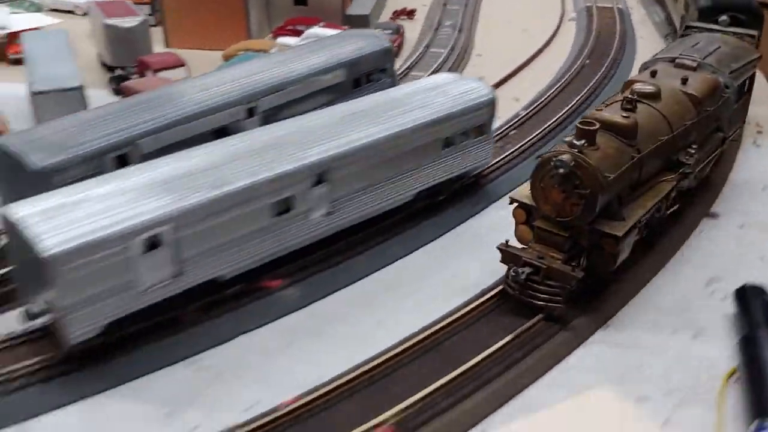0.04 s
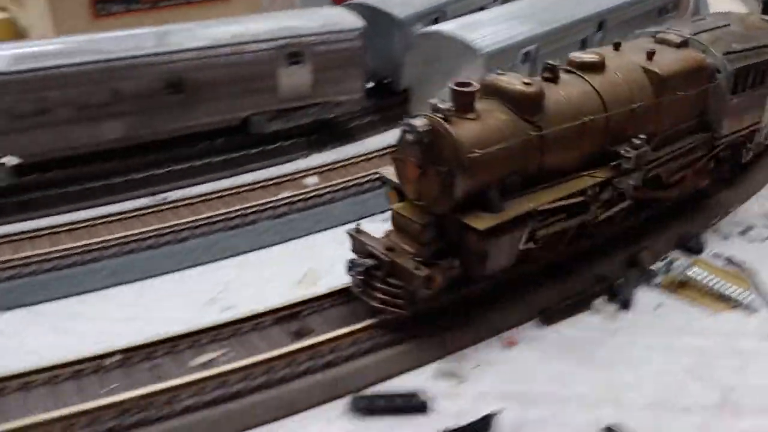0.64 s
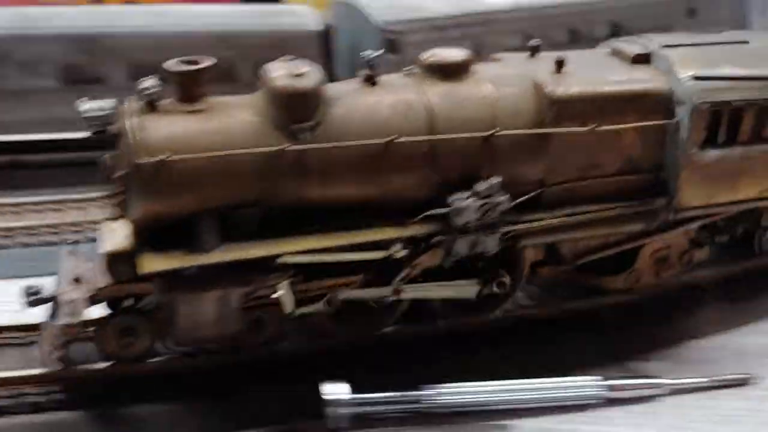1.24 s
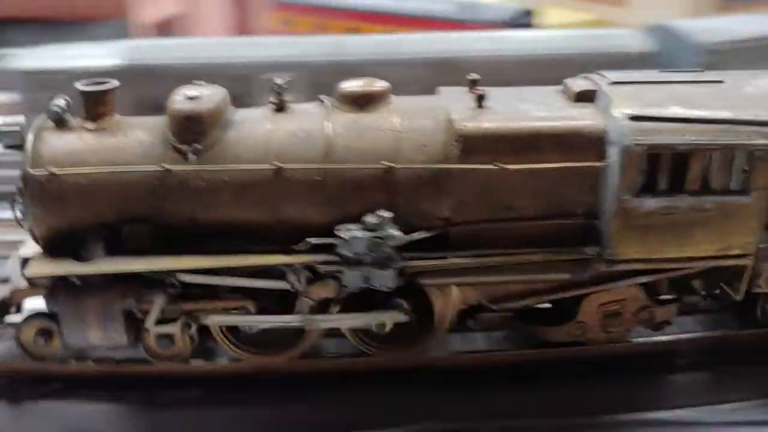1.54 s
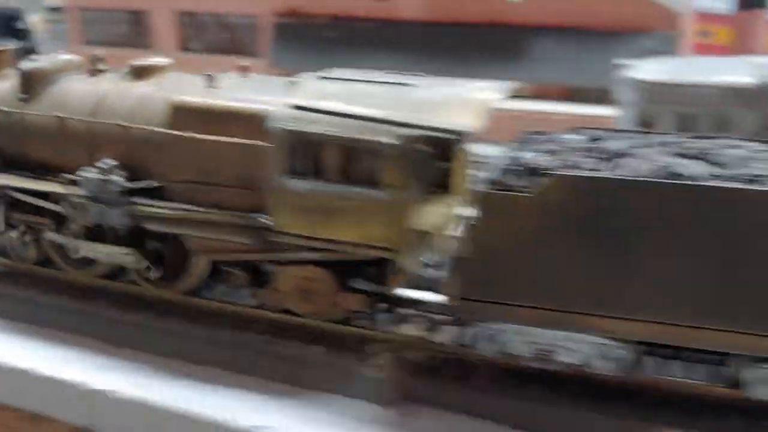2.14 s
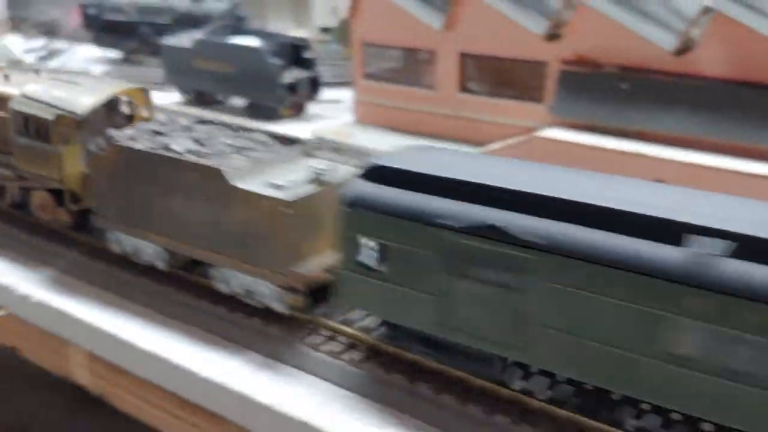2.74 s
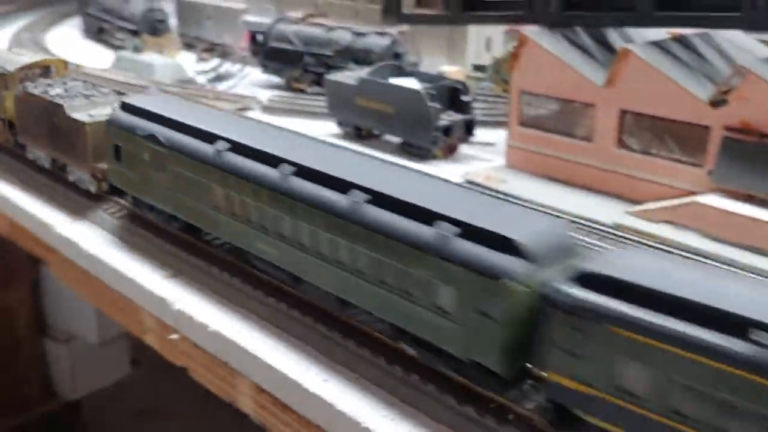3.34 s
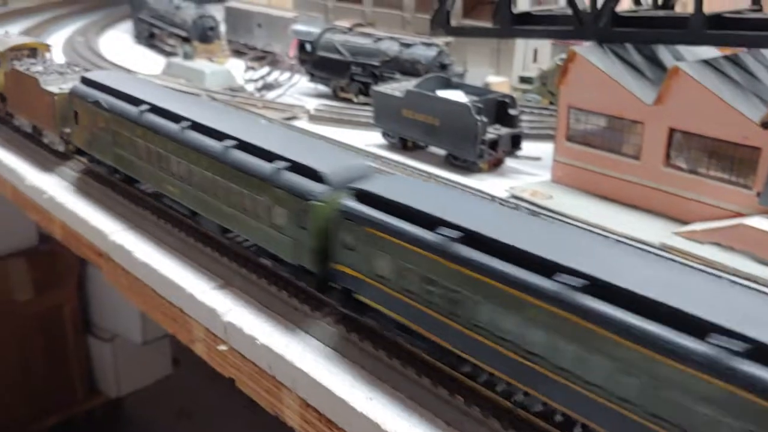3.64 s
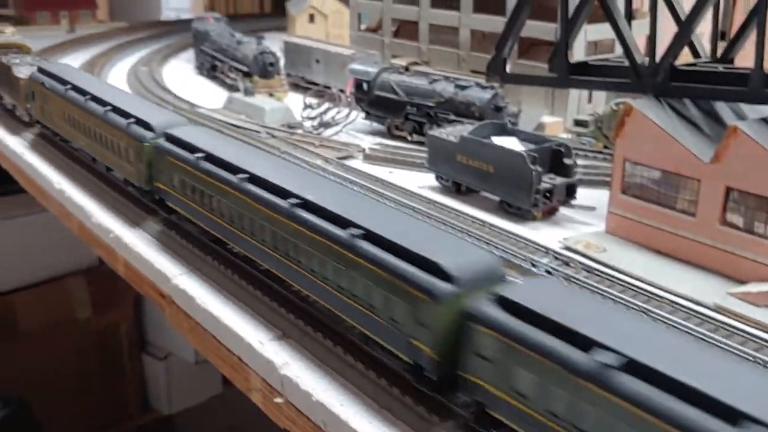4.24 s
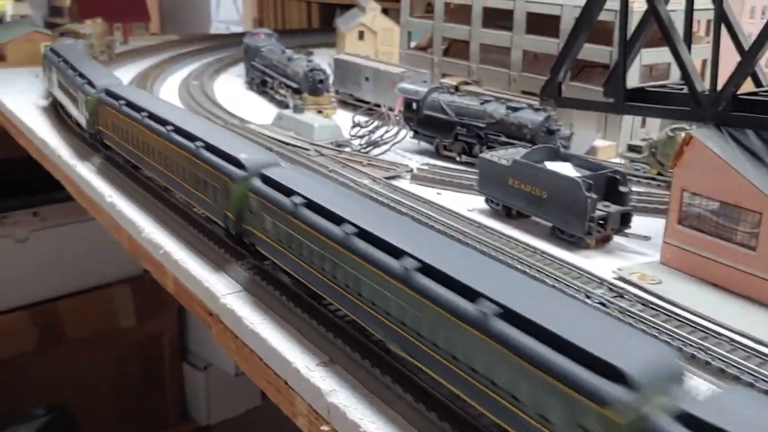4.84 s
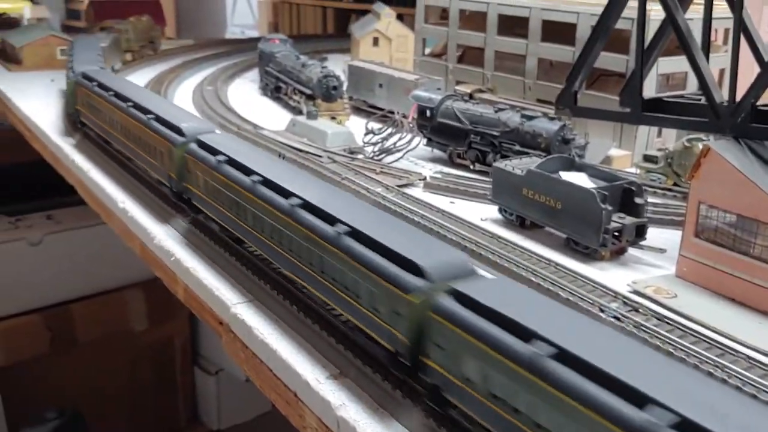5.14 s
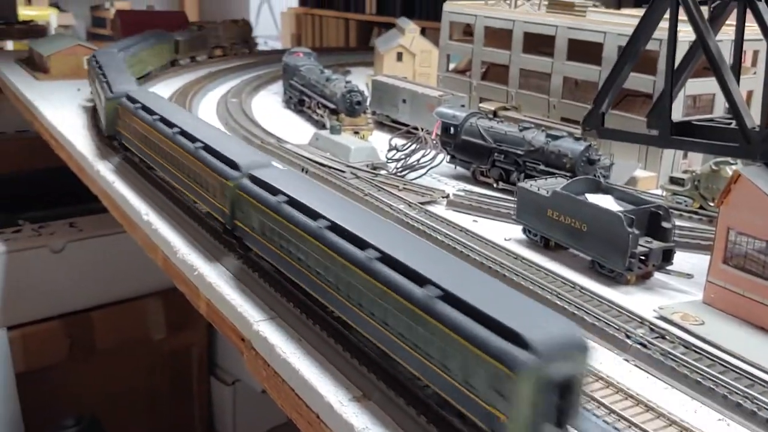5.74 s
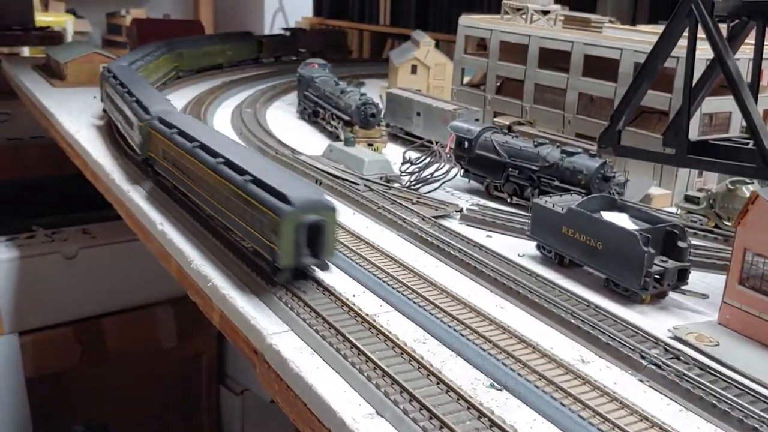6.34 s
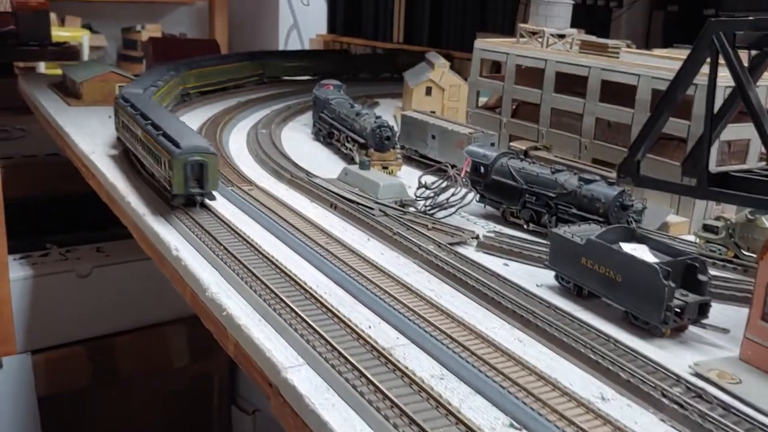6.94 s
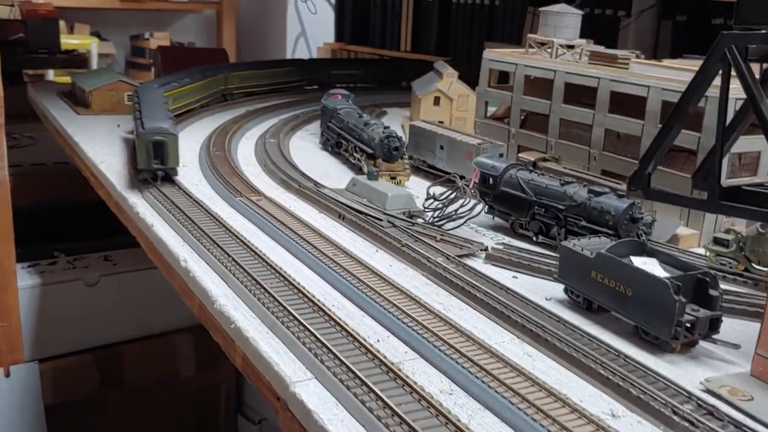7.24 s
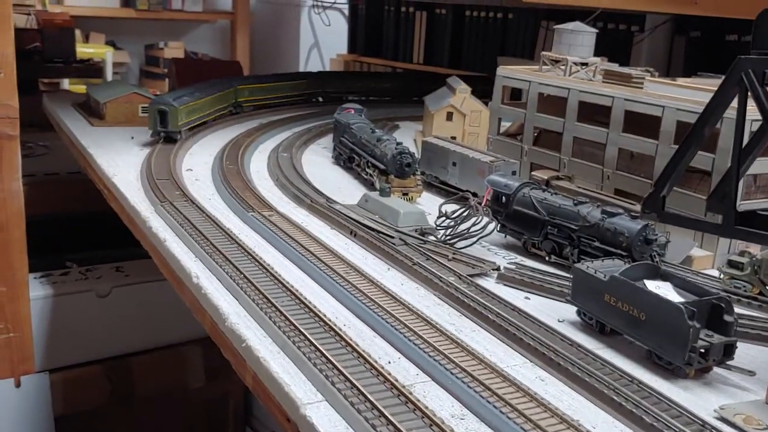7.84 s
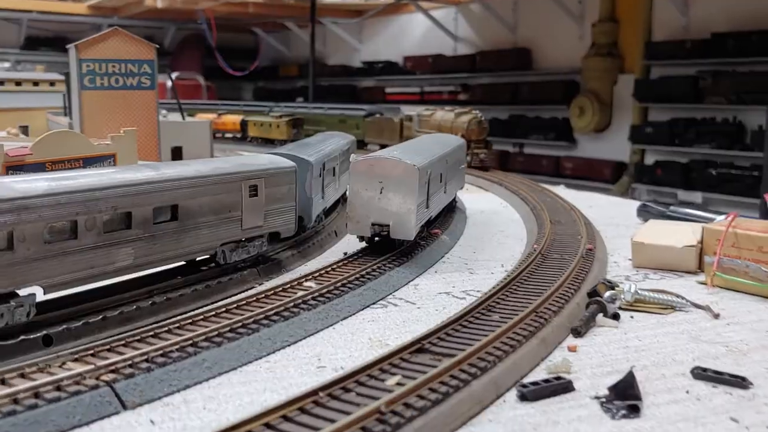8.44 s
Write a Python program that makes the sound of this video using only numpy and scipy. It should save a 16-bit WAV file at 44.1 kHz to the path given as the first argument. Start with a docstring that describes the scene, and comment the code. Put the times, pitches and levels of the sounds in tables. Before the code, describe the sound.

A model steam locomotive runs close by on an indoor table layout, over a steady low hum from the board. From the start its gears growl and whine with a wavering note, while the wheels tick over rail joints. It is nearest at about 1 to 2 seconds, when loose side rods clack and chatter. The hollow tender passes around 3 seconds with a cluster of clicks and a thin, high scraping hiss. The coaches follow until about 6 seconds, their wheels ringing in a quick uneven beat with swells of hollow roar. One coach lurches with a knock at 5.2 seconds. From about 5.7 seconds the gears fade somewhat and the wheels grind through a curve. At about 8 seconds a thin tick marks a sudden change to the locomotive approaching again, with a motor drone, rasping gears and a brief rattle at 8.5 seconds.

```python
"""A model steam locomotive passes close by on a table layout: its gears growl and whine, the baseboard
hums, and slack side rods clack. The hollow tender and the coaches follow, their wheels ringing in an
uneven beat and ticking over rail joints. A coach lurches, the locomotive turns out of sight, and the
flanges grind in the curve. Near the end the scene jumps, with a thin tick, to a spot where the
locomotive is heard approaching again."""
import sys
import numpy as np
from scipy import signal
from scipy.fft import rfft, irfft, next_fast_len
from scipy.io import wavfile
from scipy.ndimage import uniform_filter1d, map_coordinates

SR = 44100
rng = np.random.default_rng(int(sys.argv[2]) if len(sys.argv) > 2 else 0)


def unload_audio(sound):
    """Save the sound as a 16-bit wav file, at the path given as the first command line argument."""
    columns = np.transpose(np.atleast_2d(sound))
    # keep every value between -1 and 1, then stretch to whole-number steps
    steps = np.round(np.clip(columns, -1, 1) * 32767)
    wavfile.write(sys.argv[1], SR, steps.astype(np.int16))


N = 379240
TIME = np.arange(N) / SR

# Spectra of the radiating parts: (frequency [Hz], relative level [dB])
GEAR_SPECTRUM = [(150, -62), (330, -10), (430, -6.5), (530, -1), (680, -1), (850, -0.5), (1100, 0),
                 (1400, -1), (2000, -2), (3500, -32), (7000, -51)]
FAR_GEAR_SPECTRUM = [(250, -10), (450, 0.5), (950, 4.5), (1200, 3.5), (1750, 7), (2500, 0.5), (3200, -1),
                     (4000, 4), (4500, -1.5), (5400, -6), (7000, -9), (16000, -15)]
RATTLE_SPECTRUM = [(1000, -28), (2200, -1), (3000, 6), (3800, 2), (4700, 3), (5600, -1), (7000, 0.5),
                   (16000, -4.5)]
FAR_RATTLE_SPECTRUM = [(1000, -18), (2000, 3), (3000, 3), (4000, 9), (5400, -3), (7000, 1.5), (10000, -5),
                       (16000, -11)]
TREAD_SPECTRUM = [(300, -22), (700, -15.5), (1100, -7), (1450, -3.5), (1700, -1.5), (1950, -2), (2300, -3),
                  (2600, -5), (3200, -8), (4200, -10.5), (5500, -17.5), (9000, -31)]
SCRAPE_SPECTRUM = [(4000, -40), (8000, -8), (10500, 4.5), (13000, 0), (15500, -3)]
GRIND_SPECTRUM = [(1600, -23), (2300, -3), (2600, 5), (3100, 0), (4500, -14), (8000, -29)]
TRUCK_SPECTRUM = [(300, -14), (2000, 2), (7000, 2.5), (8500, -1), (10500, -30)]
RAIL_END_SPECTRUM = [(6000, -40), (8500, -4), (10000, 3), (15000, 4)]
ROAR_SPECTRUM = [(450, -37), (750, -1.5), (1000, -5.5), (1300, 0.5), (1600, -4), (2300, -33)]
DRONE_SPECTRUM = [(90, -27), (125, -3), (148, 5.5), (170, -2.5), (210, -13.5), (300, -63)]
BOARD_SPECTRUM = [(35, -34), (70, -19), (105, -2), (130, 3.5), (160, -5), (185, 0), (210, -1.5), (270, -6),
                  (340, -7), (430, -12.5), (900, -55)]
FRAME_SPECTRUM = [(15, -18), (28, -11), (38, -14), (49, 2.5), (56, -1), (66, -2.5), (85, -5.5), (120, -27),
                  (250, -56)]
TICK_SPECTRUM = [(2000, -22), (6000, -12), (9000, -6), (16000, -4)]
# Resonances of metal parts: (frequency [Hz], bandwidth [Hz], relative level [dB])
BOILER_MODES = [(498, 20, 7), (603, 31, 3.5), (700, 43, -1), (784, 90, -9)]
WHEEL_MODES = [(1724, 120, -16), (1980, 210, -3), (2255, 140, -5.5)]
TENDER_MODES = [(190, 38, -1.5), (255, 60, -9.5), (693, 88, 0.5), (1133, 110, 0.5), (1304, 99, 0)]
# Resonances of a coach body: (frequency [Hz], level [dB], 60 dB decay time [s])
COACH_MODES = [(417, -14.5, .05), (360, -33, .04), (490, -30, .035)]
# Tonal swells of gears and baseboard: (time [s], frequency [Hz], level [dB], half-width [s])
GEAR_WHINES = [(.14, 646, -35, 0.08), (0.58, 637, -37, 0.15), (1.0, 658, -39, 0.088),
               (1.497, 654, -39.5, 0.07), (1.966, 571, -39.5, .14), (2.7, 673, -42, 0.15),
               (4.87, 644, -42, 0.09)]
BOARD_BUMPS = [(0.344, 205, -32.5, 0.042), (1.234, 85.7, -28.5, 0.021), (1.387, 114.5, -34, 0.027),
               (2.128, 75.5, -35, 0.033), (6.805, 126, -39, 0.044)]
# Tones of rubbed metal: (time [s], frequency [Hz], bandwidth [Hz], level [dB], half-width [s])
LOCOMOTIVE_TONES = [(.17, 1910, 40, -39, 0.14), (.2, 334.7, 50, -42, 0.18), (.12, 910, 35, -39, 0.12),
                    (.15, 1510, 90, -41, 0.22), (.37, 2000, 45.5, -40, 0.057), (.5, 634, 30, -36.5, 0.055),
                    (.65, 595, 45, -36, 0.088), (.89, 1082, 80, -38, 0.09), (1.08, 1097, 45, -35.5, .09),
                    (1.14, 2040, 40, -34, 0.06), (.68, 2100, 200, -38, .17), (1.1, 1623, 109, -36, .14),
                    (1.13, 2910, 352, -35, 0.19), (1.4, 1400, 149.3, -38, 0.11),
                    (1.472, 510, 60.7, -41, 0.28), (1.6, 1653, 110, -38, .16)]
WHEEL_TONES = [(2.05, 1730, 121, -41, 0.098), (2.33, 1815, 110, -37.5, 0.09), (2.64, 1690, 100, -35.5, .12),
               (2.97, 1973, 50, -36, .1), (3.2, 1935, 40.2, -34, 0.052), (3.52, 1950, 40, -31, .055),
               (3.76, 2360, 110, -37.5, .07), (3.84, 1980, 130, -34, 0.08), (3.95, 1760, 130.6, -41, 0.33),
               (4.19, 2016, 70, -33.5, 0.06), (4.5, 1895, 80, -37, .07), (5.12, 2050, 90, -37, .06),
               (5.21, 1820, 50, -38.5, .035), (5.9, 2105, 159.6, -48, .35), (6.8, 2100, 119, -40, 0.065),
               (7.34, 1950, 79.7, -38, 0.11), (7.58, 1930, 60, -38, 0.1), (7.87, 1900, 80.6, -37, .08)]
# Moments of harder rattling and rubbing: (time [s], gain [dB], half-width [s])
RATTLE_BOOSTS = [(.11, 3, 0.072), (1.83, 0.8, 0.087), (4.3, 1.1, 0.25), (6.76, 0, 0.053), (7.9, 2, 0.18)]
CURVE_RUBS = [(5.27, 0.7, .2), (7.25, 2, 0.089), (7.83, 1.5, 0.22)]
# Side rods striking their bearings: (time [s], level [dB])
ROD_CLACKS = [(1.096, -22), (1.118, -23), (1.229, -15), (1.3105, -20), (1.4326, -22), (1.5673, -22),
              (1.7345, -26), (1.7963, -19), (1.8462, -20), (1.9315, -26), (2.0313, -23)]
# Flanges biting the rail: (time [s], level [dB], rise [s], fall [s])
FLANGE_BITES = [(.55, -35, 0.96, .65), (2.95, -32.5, 0.2, 0.58), (3.85, -33.5, 0.38, 1.1)]
# Rail-gap hits, also holding the side-rod clacks at 1.2296 and 1.3109 s: (time [s], relative level [dB], truck
# gain [dB])
RAIL_JOINTS = [(0.092, -36, 0), (0.2433, -39, -2), (0.339, -33, -14), (0.4125, -36, -9), (0.4342, -35, -8),
               (0.5761, -38, -4), (0.8545, -39, -8), (1.137, -34, 1), (1.2296, -35, -3), (1.3109, -38, -3),
               (1.65, -35, -12), (2.209, -36.5, 3), (2.299, -38, 1), (2.7382, -35, -2), (2.8916, -34, 1),
               (2.9208, -35, -7), (2.938, -35, -4), (3.065, -41, 6.5), (3.1108, -37, 3), (3.1817, -36, -2),
               (3.7189, -31, -5), (6.8044, -45, 5), (8.2217, -44, 5), (8.4008, -38, -14)]
# Swells of the hollow coaches: (time [s], level [dB], half-width [s])
COACH_ROARS = [(2.717, -36.5, 0.13), (3.13, -32.5, 0.11), (3.8, -37.5, .22), (4.35, -37.5, 0.29),
               (4.902, -42, 0.13), (5.3, -32.7, 0.16), (6.7, -40, 0.27)]
# Likeness of the two channels: (frequency [Hz], correlation [-1 to 1])
COHERENCE = [(60, 0.91), (130, 0.98), (290, 0.89), (640, 0.71), (1000, 0.24), (1400, -0.041), (3000, -0.01)]
# Direction of the passing train: (time [s], left minus right [dB])
TRAIN_PAN = [(0, 3.5), (2, 1), (7.8, -.5), (8.6, 1)]
# Direction of the approaching gears: (frequency [Hz], left minus right [dB])
FAR_GEAR_PAN = [(700, 7.0), (1300, -0.5), (2400, -0.5), (4200, -11.0), (7000, -2.0)]
# Response of the two channels: (frequency [Hz], left gain [dB], right gain [dB])
CHANNEL_GAINS = [(100, -0.3, -1), (785, 3, 3), (1270, 2, 1), (1874, -5, 6), (2680, 1, 4), (4040, -0.1, 2.5),
                 (5370, 0.5, 1.3), (6400, -1.5, 3.5), (6994, -7, 11), (7964, -17, -9.5),
                 (8510, -33.5, -33.5), (9990, -9, -18), (10200, -26.5, -14), (11470, -9.5, -11),
                 (13400, -31, -18.5), (15200, -38.7, -30)]

# Parts going by: (nearest time [s], half-power time [s], direct level [dB], reverberant level [dB])
GEAR_PASS, WHEEL_PASS = (1.25, 1, -29, -33.5), (2.5, 2.2, -27, -28.5)
ROD_PASS, COUPLER_PASS = (1.75, 0.75, -25, -36.5), (3.5, 0.74, -32.5, -41)
BOARD_PASS, COACH_PASS = (0.6, 0.52, -32.5, -41.5), (4.5, 0.6, -42.5, -46.5)
COACHES_S, CURVE_S, JUMP_S = 2.62, 5.74, 8.056


def gear_growl(beat):
    """Impact noise: gear teeth collide, then fall into the cars' acoustic shadow in the curve."""
    shadow_db = 4 * onset(CURVE_S, 0.3)
    teeth = interference(noise() + 0.68 * impacts(600, 7.3), depth_db=2.0)
    return pass_by(*GEAR_PASS) * amp(-0.48 - shadow_db + 0.23 * beat) * radiate(teeth, GEAR_SPECTRUM)


def gear_whine():
    """Periodic excitation: the gear mesh sings a wavering note with a weak third harmonic."""
    wavering_time = np.cumsum(1 + 0.017 * wobble(70)) / SR
    out = np.zeros((2, N))
    for s, hz, db, width_s in GEAR_WHINES:
        phase = 2 * np.pi * hz * wavering_time + np.array([[0], [.7]])
        out += amp(db) * swell(s, width_s) * (np.sin(phase) + amp(-17) * np.sin(3 * phase))
    return amp(2.0 * wobble(25.3)) * out


def rolling_wheels(beat):
    """Rolling contact: rough treads rumble, and the coach wheels ring at their natural modes."""
    treads = radiate(interference(noise() + .5 * impacts(1800, 5.3), depth_db=2.06), TREAD_SPECTRUM)
    arrived = onset(COACHES_S, 0.39)
    ring = arrived * amp(-9.5 + 1.2 * wobble(9)) * resonate(noise() + impacts(1800, 8.1), WHEEL_MODES)
    gain_db = boost_db(CURVE_RUBS) - 1.7 + 0.31 * beat + 0.6 * wobble(32) + 0.35 * wobble(6)
    return pass_by(*WHEEL_PASS) * amp(gain_db) * (amp(-2.7 * (1 - arrived)) * treads + ring)


def wheel_beat(turn_hz=10.8, drift_hz=0.594):
    """Amplitude modulation: out-of-round wheels bear down once a turn, some turns harder than others."""
    angle = 2 * np.pi * np.cumsum(turn_hz + drift_hz * wobble(2.466)) / SR
    return (np.cos(angle) - 0.26 * np.sin(2 * angle)) * (1 + 0.14 * wobble(3.8))


def loose_rattle(beat):
    """Mechanical play: loose rods and couplers chatter as they go by, and their powers add."""
    chatter = interference(noise() + 0.7 * impacts(1300, 9.5), depth_db=2.0)
    nearness = np.hypot(pass_by(*ROD_PASS), pass_by(*COUPLER_PASS))
    gain_db = boost_db(RATTLE_BOOSTS) - 0.12 + 0.81 * beat + 1.33 * wobble(60)
    return nearness * amp(gain_db) * radiate(chatter, RATTLE_SPECTRUM)


def side_rods(t60_s=0.036):
    """Damped impact: each knock of a rod in its slack bearing decays exponentially."""
    envelope = sum(amp(db - 60 * abs(TIME - s) / t60_s) * (TIME >= s) for s, db in ROD_CLACKS)
    return envelope * radiate(noise(), RATTLE_SPECTRUM)


def flange_scrape(beat):
    """Sliding friction: flanges bite the rail with a high hiss and let go."""
    bite = sum(amp(db) * swell(s, rise, fall) for s, db, rise, fall in FLANGE_BITES)
    flutter = amp(1.2 * beat + 2.1 * wobble(40))
    return bite * flutter * radiate(noise() + impacts(350, 6.4), SCRAPE_SPECTRUM)


def rubbed_metal(tones):
    """Friction-driven resonance: modes sing out in turn, each a wavering note over a noisy ring."""
    out = np.zeros((2, N))
    for s, hz, band_hz, db, width_s in tones:
        phase = 2 * np.pi * np.cumsum(hz + 0.4 * band_hz * wobble(70)) / SR
        note = np.sqrt(2) * np.sin(phase + rng.uniform(-0.95, 0.84, (2, 1)))
        ring = amp(-2.5) * resonate(noise(), [(hz, band_hz, 0)])
        out += amp(db) * swell(s, width_s) * unit(note + ring)
    return out


def tender(nearest_s=2.9):
    """Shell resonance: the hollow tender rings, loudest when nearest."""
    distance = np.hypot(1, (TIME - nearest_s) / 0.69)
    return amp(-31.3) / distance ** 2 * resonate(noise(), TENDER_MODES)


def coach_roar():
    """Cavity resonance: the hollow coaches roar over some stretches of track."""
    envelope = sum(amp(db) * swell(s, width_s) for s, db, width_s in COACH_ROARS)
    return envelope * radiate(noise(), ROAR_SPECTRUM)


def curve_grind(beat):
    """Sliding friction: the coaches' flanges grind once the train is in the curve."""
    level_db = -40.5 + boost_db(CURVE_RUBS) + 0.87 * beat + 1.9 * wobble(45) + 1.6 * wobble(9)
    friction = noise() + 1.3 * impacts(260, 5.3)
    return onset(CURVE_S, 0.37) * amp(level_db) * radiate(friction, GRIND_SPECTRUM)


def coach_lurch(s=5.226, lead_s=.012):
    """Free vibration: a coupler clacks, then the jolted coach body rings in damped modes."""
    body = sum(amp(db) * blow(s, .005, t60_s) * np.sin(2 * np.pi * hz * (TIME - s))
               for hz, db, t60_s in COACH_MODES)
    clacks = blow(s - lead_s, .001, .025) + blow(s, .002, 0.059)
    return body + amp(-27) * clacks * radiate(noise(), TREAD_SPECTRUM)


def rail_joints(flight_s=0.0045, loss_db=9):
    """Inelastic collision: a wheel strikes a rail gap, or a rod its bearing, and bounces twice, weaker each
    time."""
    rail, truck = np.zeros((2, 2, N + SR))
    t = np.arange(SR // 20) / SR
    decay = amp(-60 * t / 0.0059) + 0.14 * amp(-60 * t / 0.027)  # sharp tick, then metallic shiver
    for s, db, truck_db in RAIL_JOINTS:
        for bounce in range(3):
            at = round((s + bounce * flight_s * rng.uniform(.6, 1.4)) * SR)
            hit = amp(db + 20 - bounce * loss_db) * decay * rng.standard_normal((2, len(t)))
            rail[:, at:at + len(t)] += hit
            truck[:, at:at + len(t)] += amp(truck_db) * hit
    return coloured(rail[:, :N], RAIL_END_SPECTRUM) + coloured(truck[:, :N], TRUCK_SPECTRUM)


def approaching_motor(beat, note_hz=600):
    """Forced vibration: the motor drones in the boiler shell, with a clear note inside the swell."""
    note = np.sin(2 * np.pi * note_hz * TIME + 0.55 * wobble(35))
    shell = swell(8.19, 0.22, 0.3) * resonate(radiate(noise(), GEAR_SPECTRUM), BOILER_MODES)
    motor = shell + amp(1.5) * swell(8.26, .1) * note
    return panned(amp(-36 + 1.2 * beat) * motor, 2.7)


def approaching_gears(beat):
    """Impact noise: from ahead the teeth rasp evenly, each band leaning to its own side."""
    teeth = interference(noise() + 0.47 * impacts(1500, 4.8), depth_db=2.5)
    rasp = amp(-29.5 + 0.73 * beat) * radiate(teeth, FAR_GEAR_SPECTRUM)
    return filtered(rasp, lambda hz: panned(1, along(FAR_GEAR_PAN, hz)))


def approaching_rods():
    """Mechanical play: the rods rattle once, to the right."""
    rattle = radiate(noise() + 0.76 * impacts(900, 9), FAR_RATTLE_SPECTRUM)
    return panned(amp(-26.5) * swell(8.545, 0.028) * rattle, -5)


def baseboard(gain):
    """Sounding-board radiation: the train shakes the broad panel under the track."""
    return gain * radiate(noise(), BOARD_SPECTRUM)


def coach_drone():
    """Forced vibration: the shaken hollow cars drone as they go by."""
    return pass_by(*COACH_PASS) * radiate(noise(), DRONE_SPECTRUM)


def table_frame(tone_hz=39.0):
    """Structure-borne sound: the frame hums steadily and booms briefly where the load shifts."""
    hum = amp(-42 + 1.2 * wobble(2.83)) * radiate(noise(), FRAME_SPECTRUM)
    tone = amp(-58 + 2.5 * wobble(5)) * np.sin(2 * np.pi * tone_hz * TIME + 0.66 * wobble(5.4))
    bumps = sum(amp(db) * swell(s, width_s) * np.sin(2 * np.pi * (hz * TIME + rng.random()))
                for s, hz, db, width_s in BOARD_BUMPS)
    return panned(hum + tone, 1.5) + bumps


def pass_by(nearest_s, half_s, direct_db, reverberant_db):
    """Spherical spreading: direct sound falls with distance while the reverberant field stays."""
    distance = np.hypot(1, (TIME - nearest_s) / half_s)
    return np.hypot(amp(direct_db) / distance, amp(reverberant_db))


def interference(x, depth_db):
    """Interference of shifting reflections, as random swelling and fading of narrow bands."""
    bands = signal.stft(x, nperseg=2048)[2]
    field = uniform_filter1d(rng.standard_normal(bands.shape), size=4, axis=1)
    field = uniform_filter1d(field, size=14, axis=2)
    return signal.istft(bands * amp(depth_db * unit(field)), nperseg=2048)[1][:, :N]


def radiate(force, spectrum):
    """Radiation through a body's spectrum, at rms 1; long waves reach both channels alike."""
    def response(hz):
        angle = np.arccos(np.clip(along(COHERENCE, hz), -1, 1)) / 2
        return amp(along(spectrum, hz)) * np.array([np.cos(angle), np.sin(angle)])
    mid, side = filtered(force, response)
    return unit(np.array([mid + side, mid - side]))


def resonate(force, modes):
    """Modal superposition: the summed response of damped resonators, at rms 1."""
    def response(hz):
        return sum(amp(db) * 1j * hz * band / (centre ** 2 - hz ** 2 + 1j * hz * band)
                   for centre, band, db in modes)
    return unit(filtered(force, response))


def impacts(per_s, spread_db):
    """Shot noise: tiny random contacts, each with its own strength in either channel."""
    sizes = amp(spread_db * rng.uniform(-0.95, 1, (2, N)))
    return unit((rng.random(N) < per_s / SR) * sizes * np.sign(noise()))


def noise():
    """Two uncorrelated white noises."""
    return rng.standard_normal((2, N))


def wobble(per_s):
    """Smooth random modulation through per_s knots a second."""
    return map_coordinates(rng.standard_normal(int(N * per_s / SR) + 4), [TIME * per_s])


def swell(s, rise_s, fall_s=None):
    """Gaussian envelope peaking at time s, symmetric unless a fall is given."""
    return np.exp(-((TIME - s) / np.where(TIME < s, rise_s, fall_s or rise_s)) ** 2)


def boost_db(rows):
    """Sum of Gaussian swells in decibels."""
    return sum(db * swell(s, width_s) for s, db, width_s in rows)


def onset(s, width_s):
    """Smooth step from 0 to 1 around time s."""
    return (1 + np.tanh((TIME - s) / width_s)) / 2


def blow(s, attack_s, t60_s):
    """Exponential attack and decay from time s."""
    t = np.maximum(TIME - s, 0)
    return (1 - np.exp(-t / attack_s)) * amp(-60 * t / t60_s)


def filtered(x, response):
    """Linear filtering by a function of frequency."""
    size = next_fast_len(N + SR // 4)
    return irfft(rfft(x, size) * response(np.fft.rfftfreq(size, 1 / SR)), size)[..., :N]


def coloured(x, spectrum):
    """Linear filtering by a table of gains in decibels."""
    return filtered(x, lambda hz: amp(along(spectrum, hz)))


def along(points, hz):
    """Interpolation on a logarithmic frequency axis."""
    knots_hz, values = np.transpose(points)
    return np.interp(np.log(hz + 1), np.log(knots_hz + 1), values)


def panned(x, left_db):
    """Direction by level difference between the channels."""
    return x * amp(np.array([[.5], [-.5]]) * left_db)


def amp(db):
    """Decibels to amplitude ratio."""
    return 10 ** (np.asarray(db) / 20)


def unit(x):
    """Normalisation to rms 1."""
    return x / np.sqrt(np.mean(x ** 2) + 1e-20)


def scene():
    """Superposition: the passing train, a thin tick at the jump, then the approaching locomotive."""
    beat = wheel_beat()
    passing = baseboard(pass_by(*BOARD_PASS)) + coach_drone()
    running_gear = gear_growl(beat) + rolling_wheels(beat) + loose_rattle(beat) + flange_scrape(beat)
    passing += panned(running_gear, np.interp(TIME, *np.transpose(TRAIN_PAN)))
    passing += gear_whine() + side_rods() + rubbed_metal(LOCOMOTIVE_TONES) + tender()
    passing += coach_roar() + curve_grind(beat) + rubbed_metal(WHEEL_TONES) + coach_lurch()
    tick = coloured(amp(3) * (np.arange(N) == round(JUMP_S * SR)), TICK_SPECTRUM)
    approaching = approaching_motor(beat) + approaching_gears(beat) + approaching_rods()
    approaching += baseboard(amp(-38))
    return np.where(TIME < JUMP_S, passing, approaching) + tick + rail_joints() + table_frame()


def record(dry, top_hz=15750):
    """Band-limited response: each channel has its own colour, the right a sharp treble resonance."""
    gains = np.array(CHANNEL_GAINS)
    left, right = gains[:, [0, 1]], gains[:, [0, 2]]
    return filtered(dry, lambda hz: amp([along(left, hz), along(right, hz)]) * (hz < top_hz))


dry = scene()
out = record(dry)
unload_audio(out)
```